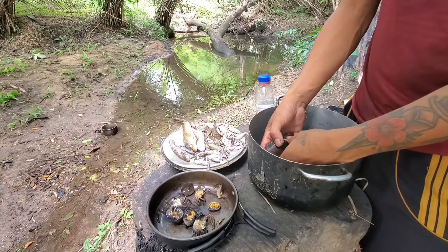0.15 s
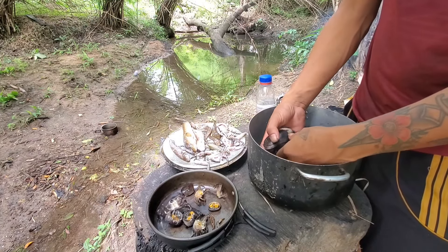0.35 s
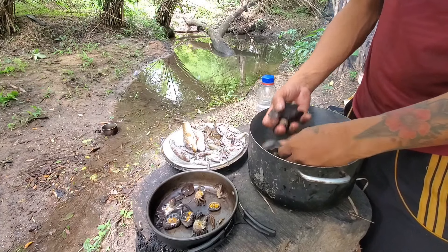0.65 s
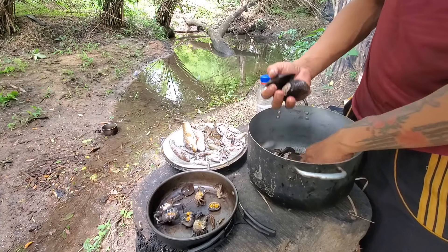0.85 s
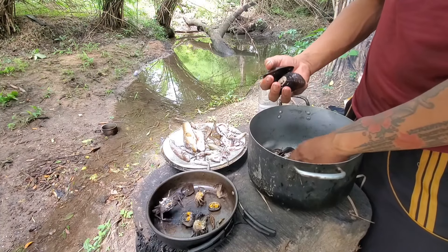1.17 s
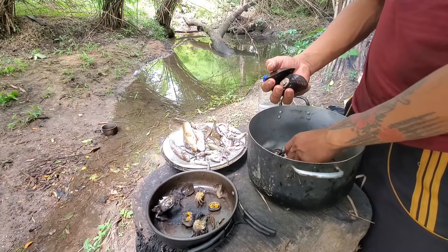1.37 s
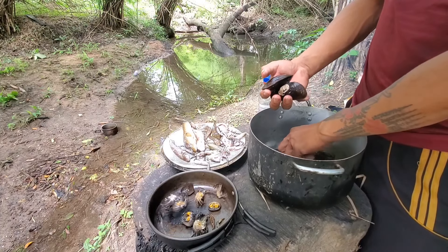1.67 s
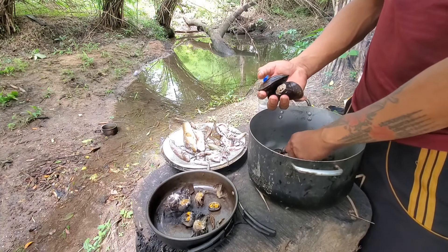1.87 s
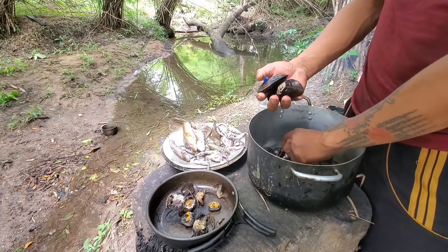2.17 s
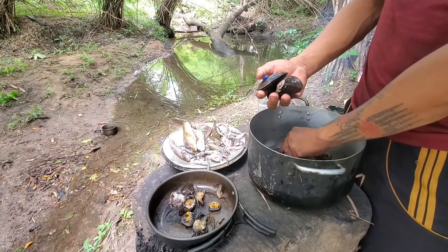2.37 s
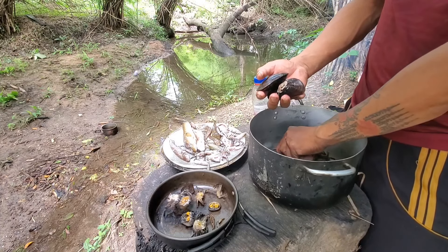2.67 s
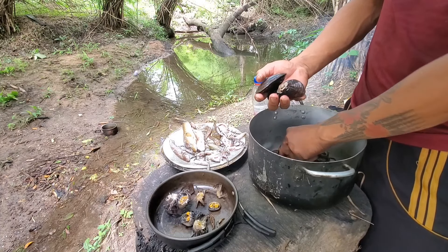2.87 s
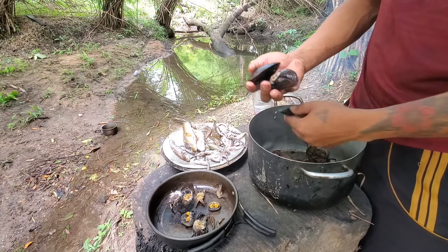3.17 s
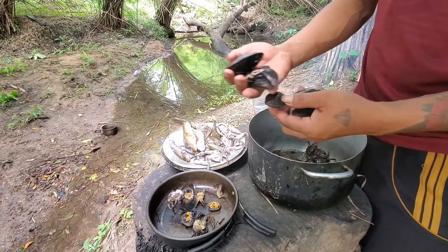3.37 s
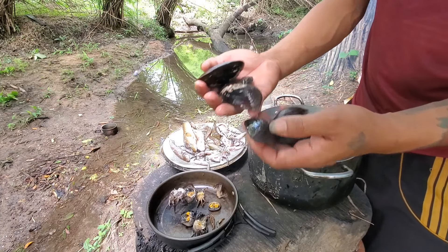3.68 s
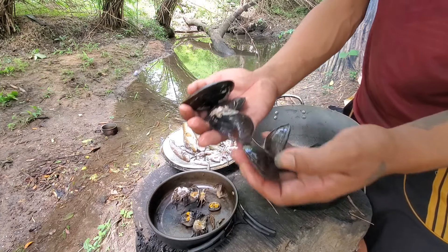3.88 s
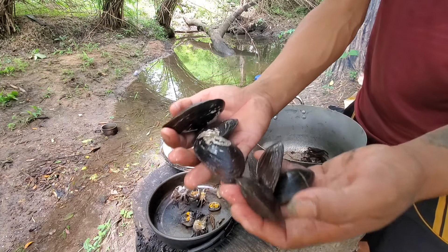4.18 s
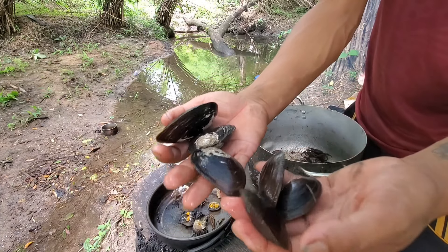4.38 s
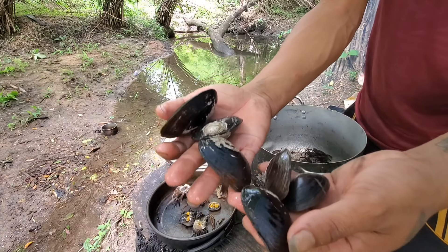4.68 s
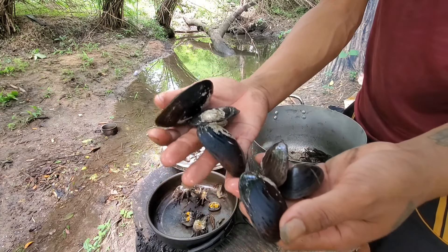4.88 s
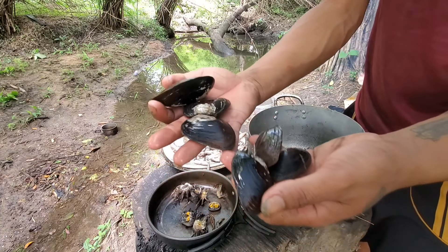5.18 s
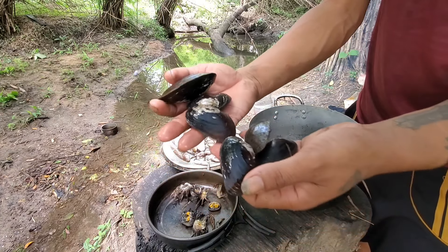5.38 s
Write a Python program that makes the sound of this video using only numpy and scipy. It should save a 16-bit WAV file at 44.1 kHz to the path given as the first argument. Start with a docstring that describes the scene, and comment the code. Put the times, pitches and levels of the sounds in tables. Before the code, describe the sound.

Hands rummage through hard wet shells in a booming metal pot; clatter thins to faint palm sliding amid insects and bird whistles.

```python
"""Wet mussel shells grind and click close to the microphones, over still air and steady insect buzz.
A man gropes for them in a metal pot standing to the right; most knocks make its bottom boom, short and hollow.
Birds whistle and chirp from the trees behind. Lifted out, the shells slide softly in the palms.
Grinding is random stick-slip noise, pot and birds are sine tones, air and insects are coloured noise."""
import sys
import numpy as np
from scipy import signal
from scipy.fft import rfft, irfft
from scipy.io import wavfile
from scipy.ndimage import uniform_filter1d

SR = 44100
rng = np.random.default_rng(int(sys.argv[2]) if len(sys.argv) > 2 else 0)


def generate_wav(sig):
    """Save sig (samples, or channels by samples) to the path in sys.argv[1] as 16-bit PCM at SR."""
    pcm = np.round(np.clip(np.atleast_2d(sig).T, -1, 1) * 32767).astype(np.int16)
    wavfile.write(sys.argv[1], SR, pcm)


N = 244314
TIME = np.arange(N) / SR
AGE = np.arange(SR // 4) / SR   # seconds since a contact

# Levels in these tables come ahead of each layer's trim; spectra are relative.
# two microphones, likeness of left and right: f/Hz, correlation (-1 to 1)
MIC_LIKENESS = [(60, 0.86), (290, 0.65), (640, 0.85), (1400, 0.36), (3100, -0.2), (7000, -0.02), (15000, 0)]
# two microphones, balance: f/Hz, left minus right level/dB
MIC_BALANCE = [(60, -5), (200, -2.5), (380, -1.5), (700, -5.5), (1300, -3), (2400, -2.5), (4400, -4.5),
               (8100, 1.7), (15000, -0.5)]
CUTOFF_HZ = 15800

# the air of the place, spectrum: f/Hz, level/dB per Hz
AIR_SPECTRUM = [(25, -10), (55, 4.5), (110, -2.5), (220, -8.5), (500, -16.5), (1000, -16), (2000, -22.5),
                (3200, -7.5), (5000, -15), (8000, -20.5), (12500, -17.5), (15500, -31.5)]
# insect buzz, spectrum: f/Hz, level/dB per Hz
INSECT_SPECTRUM = [(3500, -52), (4700, -14.5), (5150, 4.0), (5450, 0.5), (5900, -7.5), (7500, -36.0)]
# moments when the buzz swells briefly: t/s
INSECT_SWELL_TIMES = [5.06, 5.2]
AIR_DB, INSECTS_DB = -72.5, -72.5
SWELL_S, SWELL_DB = .03, 6

# hand pressure between shoves, as grinding: t/s, level/dB
HAND_PRESSURE = [(0, -51), (0.5, -50), (0.78, -54.5), (0.92, -58.5), (1.02, -46), (1.3, -53.5),
                 (1.45, -45.5), (1.8, -55), (2.1, -47), (2.42, -58.5), (2.76, -56.5), (2.9, -64.5),
                 (3.4, -59), (3.85, -58.5), (4.25, -65.5), (4.55, -72), (4.76, -81), (5.54, -87)]
# shoves through the heap: start t/s, length t/s, grinding level/dB,
# edge rasp level/dB and hollow drag level/dB (both relative to that grinding)
SHOVES_THROUGH_HEAP = [(0.074, 0.067, -46.5, -1, -31), (0.165, 0.051, -54, -10, 0),
                       (0.331, 0.088, -36, 0.5, -3), (0.497, 0.053, -39, -24, -23),
                       (0.559, 0.04, -36, -8.5, -12), (0.658, 0.076, -41.5, -25, -21),
                       (0.953, 0.056, -50.5, -3, -2.5), (1.132, 0.079, -42.5, -3, -4.5),
                       (1.355, 0.071, -58.5, 0, 7.5), (1.46, 0.097, -38, -21, -12),
                       (1.642, 0.054, -47, -2, -11), (1.826, 0.16, -51, 0.5, -3),
                       (1.956, 0.12, -46, 0.5, -31), (2.164, 0.056, -47, 3.5, -8),
                       (2.295, 0.045, -62.5, 0, 3), (2.435, 0.04, -52.5, 5, 1),
                       (2.51, 0.098, -46.5, -2.5, -13), (2.605, 0.076, -52, 1, 3),
                       (2.746, 0.038, -60, 9, 3), (2.935, 0.095, -60.5, 3.5, 4),
                       (2.991, 0.094, -51.5, 0, -7.5), (3.173, 0.097, -47, -14, -24),
                       (4.147, 0.036, -52.5, 5, -20), (5.309, 0.15, -70.5, 0.5, -5.5)]
SHOVE_ATTACK_S, SHOVE_RELEASE_S = 0.025, 0.02   # time constants
LIGHT_RASP_DB = -3.5   # under the light touch, relative to the grinding
IN_POT_DRAG_DB, IN_PALM_DRAG_DB, LIFT_S = -8, -17.5, 3.4   # drag likewise, before and after the lift
# wet sliding, takes over once the shells lie on skin: t/s, smooth share of the grinding (0 to 1)
SLIDING_SHARE = [(3.3, .4), (3.4, 0.77), (4.2, 0.92), (4.4, 0.64)]
# shell on shell, spectrum: f/Hz, level/dB per Hz
GRIND_SPECTRUM = [(700, -25.5), (1500, -15.5), (2400, -5), (3300, 1), (4400, 2), (6800, 4.5), (7900, -0.5),
                  (11000, 3), (13000, 1.5), (15500, -10.5)]
# rasping shell edges, spectrum: f/Hz, level/dB per Hz
RASP_SPECTRUM = [(400, -31.5), (900, -8), (1200, -10.5), (1430, -6.5), (1650, -1), (2000, 0.5), (2600, 0),
                 (3600, -1), (7000, -26.5)]
# shells dragged over the pot bottom, spectrum: f/Hz, level/dB per Hz
DRAG_SPECTRUM = [(30, -30.5), (70, -15.5), (110, -13.5), (280, -23), (440, -1), (600, -3.5), (740, -2.5),
                 (820, -6.5), (940, -1.5), (1080, -17.5), (1430, -5.5), (2200, -20.5), (5000, -43)]
STROKE_S = .06   # time a rubbing shell stays on one contact spot
# resonances of the hard valves: f/Hz, width f/Hz, level/dB
SHELL_RESONANCES = [(3020, 46, 3.5), (3566, 24, 4.5), (4049, 16, 7.5), (4278, 50, 0.5), (4642, 25, 1),
                    (4830, 53, -3), (6000, 80, -3.5), (6418, 17.08, -0.5), (6630, 25, -4.5),
                    (6920, 83.7, 0)]
# shell clicks on shell: t/s, level/dB, brightness/dB per octave
SHELL_CLICKS = [(0.0278, -44, 5), (0.0614, -41, 0), (0.0736, -38, -0.5), (0.1203, -41.5, 11),
                (0.1789, -45, -3), (0.2134, -41.5, -1), (0.292, -42.5, 2), (0.3545, -36, -24),
                (0.3819, -19, -2), (0.415, -22, 11), (0.4845, -38.5, -16), (0.52, -35, -1.5),
                (0.6099, -29, 4), (0.621, -32, -24), (0.7886, -46.5, 10), (0.8372, -38.5, 3),
                (1.1457, -36, 5), (1.169, -38, -3), (1.1995, -37, 1), (1.317, -45, 5), (1.3737, -45, 6),
                (1.5166, -36, 1), (1.5494, -39, 20), (1.6847, -34, 20), (1.7904, -46.5, 14),
                (1.822, -38, 15), (1.963, -45, 17), (2.0247, -40.5, -1), (2.2933, -49, 13),
                (2.4352, -46, 13), (2.5264, -41.5, 2.5), (2.6723, -48, -12), (2.746, -44.5, -1),
                (3.145, -53, -0.5), (3.1803, -47, 8.5), (3.237, -39.5, 20.5), (3.2561, -39.5, 11),
                (3.3195, -43, -4.5), (3.841, -56, 3), (4.158, -53.5, 9.5), (4.169, -53, -5),
                (4.3606, -62.5, -0.5), (4.469, -62, 8.5), (4.9106, -65.5, 2), (5.3318, -63, -4),
                (5.4444, -66.5, -2.5)]
# a click, spectrum: f/Hz, level/dB per Hz
CLICK_SPECTRUM = [(80, -46.5), (300, -27.5), (1200, -12), (2500, -1), (4200, 4.5), (6700, 3), (8000, -2),
                  (11000, -0.5), (15500, -17.5)]
# light contacts chatter on, hard ones rebound cleanly: level/dB, t60/s
CLICK_CHATTER = [(-40, 0.079), (-20.5, .037)]
TICKS_PER_S, TICK_T60_S = 33, 0.019
TICK_DB, TICK_SPREAD_DB = 0, 2   # relative to the grinding gain

# shell knocks on the pot: t/s, level/dB, clank level/dB and thump level/dB (both relative),
# main tone f/Hz (bottom boom, or at 1.318 s a tap high on the wall)
POT_KNOCKS = [(0.18, -39, -5, -36, 610), (0.31, -33.5, -22, 7.5, 373), (0.356, -34, -2.5, -32, 597),
              (0.383, -7.5, -8.5, -50, 603), (0.443, -45, -4, -30, 463), (0.461, -36, -7, -24, 582),
              (0.481, -26.5, -40, -27, 582), (0.564, -37, -8, -32, 577), (0.574, -40.5, 3.5, -32, 1230),
              (0.597, -35, 1.5, -31, 1140), (0.622, -16.5, -10, -22.5, 590), (0.627, -30, -4, -28, 888),
              (0.743, -28.5, -13, -44, 593), (1.003, -42, -11, 3.5, 496), (1.058, -42, -19, -5, 450),
              (1.142, -34.5, -0.5, -10, 463), (1.186, -61, -2, -8, 484), (1.242, -40.5, -29, -8.5, 550),
              (1.318, -43.5, -11, -28, 1440), (1.402, -30, -19, -39, 620), (1.412, -32.5, -26, -12, 512),
              (1.553, -32.5, -21, -33, 620), (1.593, -35, -9, -3, 572), (1.613, -36, -2, -7, 527),
              (1.84, -39, -25, -15, 620), (1.874, -42.5, -12, -33, 610), (1.937, -47, 1.5, -37, 720),
              (1.965, -46, -1.5, -33, 450), (2.056, -46.5, -4, -27, 760), (2.121, -42.5, -12, -32, 925),
              (2.237, -41.5, -5, -30, 545), (2.386, -48, -12, -19, 760), (2.432, -34, -16.5, -6.5, 618),
              (2.437, -42, -14, -9, 934), (2.633, -33.5, -2, -12, 585), (2.638, -41.5, -5, -16, 480),
              (2.673, -47.5, 3.5, -3, 990), (2.713, -36.5, -14.5, -17, 582), (2.764, -49, 1.5, -36, 714),
              (2.968, -49.5, -17, -23.5, 794), (3.318, -45.5, -8.5, -15, 435)]
# ringing modes of the undamped pot wall: f/Hz, level/dB, t60/s
POT_WALL_MODES = [(367.3, -36.5, 0.051), (454, -26.5, 0.16), (506, -29.5, 0.071), (559, -21, 0.11),
                  (680, -17.5, 0.057), (748.4, -28, .06), (905, -30, 0.051), (948, -10.5, 0.22),
                  (1160, -26, 0.22), (1385, -27, .06), (1446, -16, 0.14), (1700, -26.5, 0.1),
                  (1924, -24.5, 0.2), (2003, -19.5, 0.21), (2368, -32, 0.084), (2824, -25.5, 0.11),
                  (3550, -26.5, .1), (4190, -24.5, .08), (4630, -26.5, 0.07)]
# dense upper modes of the pot, spectrum: f/Hz, level/dB per Hz
CLANK_SPECTRUM = [(60, -49), (200, -20), (700, 13), (1400, 5.5), (2100, 7.5), (3200, -2.5), (5000, -10.5),
                  (9000, -25.5), (15000, -45.5)]
# thump of the pot's support, spectrum: f/Hz, level/dB per Hz
THUMP_SPECTRUM = [(30, -27), (70, -13.5), (110, 6.5), (200, 2), (280, -4.5), (380, -2), (600, -6.5),
                  (2000, -34)]
# a shell that stays pressed on thumps the support and damps the main tone:
# thump relative level/dB, main tone t60/s
PRESSED_DAMPING = [(-29, 0.04), (-4, 0.023)]
CLANK_T60_S, REBOUND_S, REBOUND_DB = .035, .0035, -3.5   # rocking onto the other valve tops up the clank
FREE_TONE_T60_S = 0.06   # with nothing resting on the bottom
RING_GROWS_PER_DB, USUAL_KNOCK_DB = 0.0016, -29   # harder knocks ring a little longer

# drawn-out bird whistles, one list each: t/s, f/Hz, level/dB
BIRD_WHISTLES = [
    [(1.46, 2960, -60), (1.56, 3007, -64), (1.63, 2927, -54), (1.66, 2960, -79)],
    [(1.68, 3400, -73), (1.74, 3350, -56.5), (1.81, 3180, -61), (1.87, 2950, -71), (1.95, 2750, -57)],
    [(4.81, 3000, -79.5), (4.85, 2940, -75.5), (4.875, 2888, -63), (4.96, 2912, -62), (5.02, 2975, -68),
     (5.06, 2950, -76)],
    [(5.05, 3166, -73), (5.14, 3260, -60), (5.2, 3030, -60.5), (5.26, 2785, -61), (5.33, 2624, -69),
     (5.43, 2390, -79.5)],
]
# falling chirps of a bird at greater distance: t/s, level/dB
FAR_CHIRPS = [(2.779, -62.5), (3.06, -61.5), (3.345, -61), (3.619, -59.5), (3.906, -61.5)]

# shells rolling in the palms: centre t/s, level/dB, swell half-width t/s
PALM_BUMPS = [(3.337, -60, 0.022), (4.263, -64.5, 0.039), (4.517, -69.5, 0.036), (4.637, -73.5, 0.048),
              (4.78, -79, 0.019)]
# the hollow of those bumps, spectrum: f/Hz, level/dB per Hz
HOLLOW_SPECTRUM = [(150, -23), (330, -19), (480, -1), (600, 1.5), (740, -12), (1000, -12.5), (2500, -27)]


def from_db(db):
    """Decibels to amplitude gain."""
    return 10 ** (np.asarray(db) / 20)


def rms_one(x):
    """Scale to unit power."""
    return x / np.sqrt(np.mean(x ** 2) + 1e-20)


def in_time(rows):
    """Each column of a curve at every sample."""
    s, *columns = np.transpose(rows)
    return [np.interp(TIME, s, column) for column in columns]


def at_hz(points, hz):
    """Read a spectrum on a log-frequency axis."""
    point_hz, values = np.array(points).T
    return np.interp(np.log(hz + 1), np.log(point_hz), values)


def add(out, s, sound):
    """Mix a sound in at time s, channel by channel."""
    i = max(round(s * SR), 0)
    out[:, i:i + sound.shape[1]] += sound[:, :N - i]


def dying(t60):
    """Exponential decay after a contact, by 60 dB in t60 seconds (3 ms at least)."""
    return from_db(-60 * AGE / max(t60, .003))


def drift(rate):
    """Smooth chance with a spread of one, drawing a new value rate times a second."""
    knots = rng.standard_normal(4000)
    return rms_one(np.interp(TIME * rate, np.arange(len(knots)), knots))


def noise(spectrum, size, tilt_db=0):
    """Coloured noise as the two microphones hear it, tilted above about 2 kHz; rms 1."""
    hz = np.fft.rfftfreq(size, 1 / SR)
    mid, side = rfft(rng.standard_normal((2, size)))
    alike = np.clip(at_hz(MIC_LIKENESS, hz), -1, 1)
    ears = np.array([[1], [-1]])   # left, right
    tilt = tilt_db * np.log2(hz / SR + 1 / 20)
    colour_db = at_hz(spectrum, hz) + tilt + ears * at_hz(MIC_BALANCE, hz) / 2
    stereo = np.sqrt(1 + alike) * mid + ears * np.sqrt(1 - alike) * side
    return rms_one(irfft(stereo * from_db(colour_db), size))


def background():
    """Still air around the microphones and a narrow band of flickering insect buzz."""
    buzz = noise(INSECT_SPECTRUM, N)
    swells = sum(np.exp(-((TIME - s) / SWELL_S) ** 2) for s in INSECT_SWELL_TIMES)
    buzz_db = INSECTS_DB + SWELL_DB * swells + 2.9 * drift(40)
    return from_db(AIR_DB) * noise(AIR_SPECTRUM, N) + from_db(buzz_db) * buzz


def effort():
    """Gains of grinding, rasping and dragging: a light touch, plus shoves that swell, hold and let go."""
    drag_db = np.where(TIME < LIFT_S, IN_POT_DRAG_DB, IN_PALM_DRAG_DB)
    touch_db, = in_time(HAND_PRESSURE)
    power = from_db([touch_db, touch_db + LIGHT_RASP_DB, touch_db + drag_db]) ** 2
    for s, length, db, rasp_db, hollow_db in SHOVES_THROUGH_HEAP:
        swell = 1 - np.exp(-AGE / SHOVE_ATTACK_S)
        release = np.exp(-np.maximum(AGE - length, 0) / SHOVE_RELEASE_S)
        gains = from_db([db, db + rasp_db, db + hollow_db])
        add(power, s, np.outer(gains, swell * release) ** 2)
    return np.sqrt(power)


def friction(spectrum, per_s, spread_db, t60, clump_db, clump_rate, stroke_s):
    """Ridges catch and slip at random; every stroke finds a new contact spot with a ring of its own."""
    slips = (rng.random(N) < per_s / SR) * rng.choice([-1, 1], N)
    strength_db = spread_db * np.minimum(rng.exponential(1, N), 4)
    slips = slips * from_db(strength_db + clump_db * drift(clump_rate))
    out, stroke, ring = np.zeros((2, N)), round(stroke_s * SR), SR // 12
    for i in range(0, N, stroke):
        spot = noise(spectrum, ring) * dying(t60)[:ring]
        add(out, i / SR, signal.fftconvolve([slips[i:i + stroke]], spot, axes=1))
    # the hand's pressure, not chance, sets how loud a stroke is
    power = uniform_filter1d(np.mean(out ** 2, axis=0), size=stroke)
    return out / np.sqrt(power + 1e-9)


def clicks():
    """Shell edges snap past each other and chatter briefly."""
    out = np.zeros((2, N))
    for s, db, tilt_db in SHELL_CLICKS:
        t60 = np.interp(db, *np.transpose(CLICK_CHATTER))
        decay = dying(t60) + from_db(-2) * dying(.015)
        onset = 1 - dying(.006)
        add(out, s, from_db(db) * decay * onset * noise(CLICK_SPECTRUM, len(AGE), tilt_db))
    return out


def ticks(grind_gain):
    """Small shells tick against their neighbours at random, as loud as the heap is being worked."""
    out, ring = np.zeros((2, N)), SR // 24
    for i in np.flatnonzero(rng.random(N) < TICKS_PER_S / SR):
        strength = grind_gain[i] * from_db(TICK_DB + TICK_SPREAD_DB * rng.standard_normal())
        add(out, i / SR, strength * noise(CLICK_SPECTRUM, ring) * dying(TICK_T60_S)[:ring])
    return out


def shell_ring(x):
    """The hard valves colour gritty grinding, clicks and ticks with their narrow resonances."""
    ringing = 0
    for hz, width, db in SHELL_RESONANCES:
        b, a = signal.iirpeak(hz, hz / width, fs=SR)
        ringing = ringing + from_db(db) * signal.lfilter(b, a, x)
    return x + ringing


def handling():
    """Wet shells grind, slide and click (bright), rasp with their edges and drag on the bottom (hollow)."""
    grind_gain, rasp_gain, drag_gain = effort()
    smooth = np.clip(in_time(SLIDING_SHARE)[0], 0, 1)
    grind = friction(GRIND_SPECTRUM, per_s=2200, spread_db=3.9, t60=.01,
                     clump_db=1.5, clump_rate=110, stroke_s=STROKE_S)
    rasp = friction(RASP_SPECTRUM, per_s=1200, spread_db=2.8, t60=.032,
                    clump_db=1.2, clump_rate=80, stroke_s=STROKE_S)
    drag = friction(DRAG_SPECTRUM, per_s=600, spread_db=2.3, t60=.06,
                    clump_db=1.5, clump_rate=60, stroke_s=STROKE_S)
    sliding = np.sqrt(smooth) * from_db(-1) * grind_gain * noise(GRIND_SPECTRUM, N)
    grinding = np.sqrt(1 - smooth) * from_db(-1.0) * grind_gain * grind
    gritty = shell_ring(grinding + clicks() + ticks(grind_gain))
    return gritty + sliding + from_db(-5.5) * rasp_gain * rasp + from_db(-0.1) * drag_gain * drag


def main_tone(hz, t60, swell_s):
    """The struck metal swells over a few cycles as the shell presses in, and is quickly damped."""
    shape = dying(t60) * (1 - np.exp(-AGE / swell_s))
    return shape / shape.max() * np.sin(2 * np.pi * hz * AGE)


def pot_ring(clank_db, freedom, vary_db, hardness):
    """A harder blow on the wall reaches the higher modes; a shell that stays pressed on damps them."""
    hz, level_db, t60 = np.transpose(POT_WALL_MODES)
    upper = np.clip(np.log2(hz / 600), 0, 1)   # 0 up to 600 Hz, 1 from 1200 Hz
    chance_db = vary_db * rng.standard_normal(len(hz))
    level_db = level_db + chance_db + hardness * min(clank_db + 10, 3) * upper
    # high modes reach the microphones out of step
    phases = np.multiply.outer(upper * (-1) ** np.arange(len(hz)), [[.8], [-.8]])
    out = 0
    for f, db, t, phase in zip(hz, level_db, t60, phases):
        out = out + from_db(db) * dying(t * freedom) * np.sin(2 * np.pi * f * AGE + phase)
    return out


def from_the_pot(x, pan_db, lag_ms):
    """The pot stands to the right: the left microphone hears it later and softer."""
    left = np.interp(AGE - lag_ms / 1000, AGE, x[0])
    return np.array([from_db(pan_db / 2) * left, from_db(-pan_db / 2) * x[1]])


def knocks():
    """Each knock is a main tone, the wall's ring, a clank of dense upper modes and a thump of the support."""
    out = np.zeros((2, N))
    no_bass = signal.butter(3, 300, "high", fs=SR, output="sos")   # a small pot radiates little bass
    no_rumble = signal.butter(2, 130, "high", fs=SR, output="sos")
    bouncing = dying(CLANK_T60_S) * (1 + from_db(REBOUND_DB) * (AGE > REBOUND_S))
    for s, db, clank_db, thump_db, hz in POT_KNOCKS:
        t60 = np.interp(thump_db, *np.transpose(PRESSED_DAMPING))
        t60 = t60 * np.exp(RING_GROWS_PER_DB * (db - USUAL_KNOCK_DB))
        freedom = min(t60 / FREE_TONE_T60_S, 1) ** 1.57   # what damps the main tone damps the wall still more
        body = from_db(-3.0) * main_tone(hz, t60, swell_s=.003)
        ring = from_db(-2.0) * pot_ring(clank_db, freedom, vary_db=3.76, hardness=0.349)
        tone = from_the_pot(signal.sosfilt(no_bass, body + ring), pan_db=-4.5, lag_ms=0.12)
        clank = signal.sosfilt(no_rumble, noise(CLANK_SPECTRUM, len(AGE)) * bouncing)
        thump = noise(THUMP_SPECTRUM, len(AGE)) * dying(0.042) * (1 - dying(0.031))
        knock = tone + from_db(clank_db) * clank + from_db(thump_db - 3.5) * thump
        add(out, s, from_db(db) * knock)
    return out


def woods(x, t60, wet_db):
    """Trunks and leaves scatter a far sound into a soft tail."""
    tail = rng.standard_normal((2, SR)) * from_db(-60 * TIME[:SR] / t60)
    tail = rms_one(tail) / np.sqrt(SR)
    return x + from_db(wet_db) * signal.oaconvolve([x], tail, axes=1)[:, :N]


def birds():
    """Pure two-part whistles, and a row of quick falling chirps from deeper in the trees."""
    whistle, chirp = np.zeros(N), np.zeros(N)
    for rows in BIRD_WHISTLES:
        hz, db = in_time(rows)
        inside = (TIME > rows[0][0]) & (TIME < rows[-1][0])
        sounding = uniform_filter1d(1. * inside, size=1500)   # soft edges
        wavering_hz = hz * (1 + 0.0082 * drift(250))
        whistle += sounding * from_db(db) * np.sin(2 * np.pi * np.cumsum(wavering_hz) / SR)
    for s, db in FAR_CHIRPS:
        progress = np.clip((TIME - s) / 0.058, 0, 1)
        hz = 3100 - 1200 * progress + 300 * drift(700)
        shape = np.sqrt(np.abs(np.sin(np.pi * progress)))
        chirp += from_db(db) * shape * np.sin(2 * np.pi * np.cumsum(hz) / SR)
    near = from_db(-0.5) * woods(whistle, t60=0.67, wet_db=4.5)
    far = from_db(1) * woods(chirp, t60=0.77, wet_db=4)
    return near + far


def bumps():
    """Cushioned by the hand, a rolling shell gives a dull swell with no click."""
    swell = sum(from_db(db) * np.exp(-((TIME - s) / length) ** 2) for s, db, length in PALM_BUMPS)
    return swell * noise(HOLLOW_SPECTRUM, N)


def scene():
    """The pot and the hands close to the microphones, the woods behind."""
    return background() + handling() + knocks() + birds() + bumps()


def record(dry):
    """The deepest bass is rolled off and the top is cut steeply."""
    thinned = signal.sosfilt(signal.butter(2, 32, "high", fs=SR, output="sos"), dry)
    return signal.sosfilt(signal.ellip(10, .1, 90, CUTOFF_HZ, fs=SR, output="sos"), thinned)


dry = scene()
out = record(dry)
generate_wav(out)
```